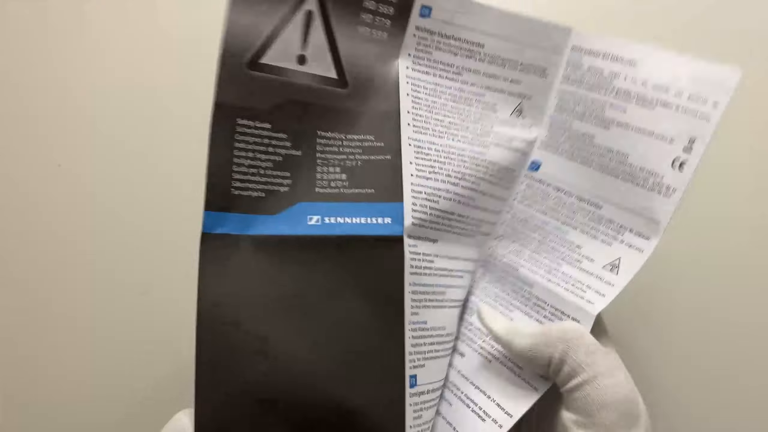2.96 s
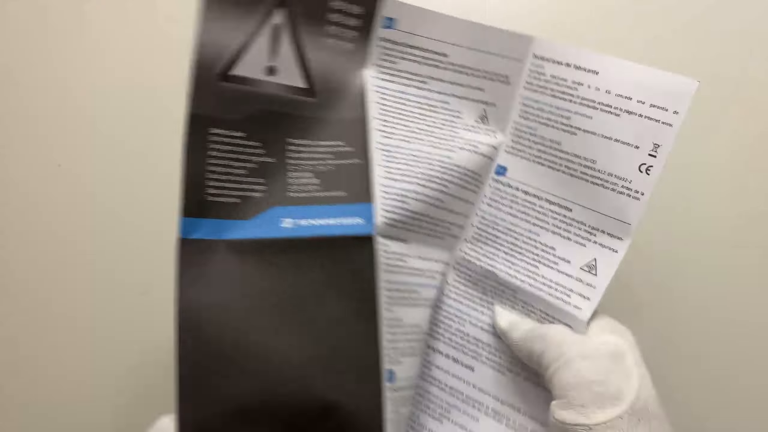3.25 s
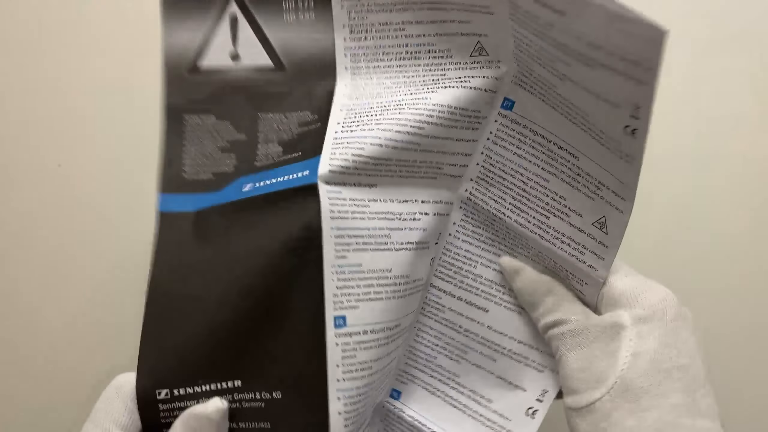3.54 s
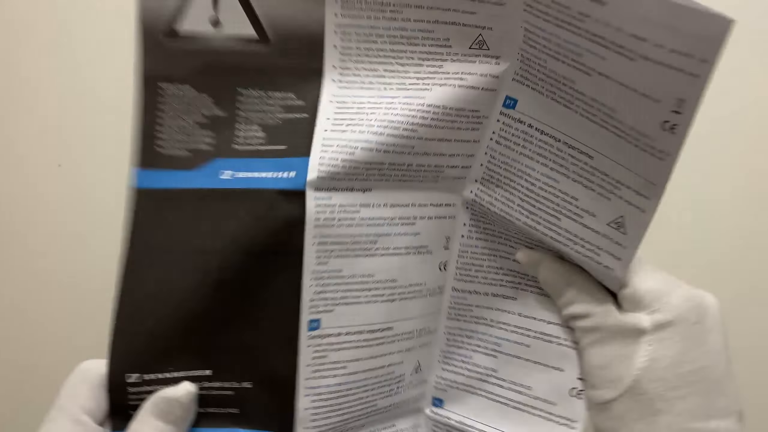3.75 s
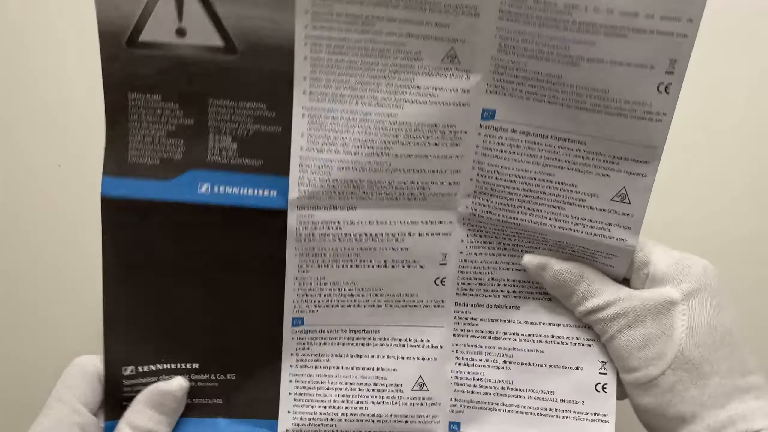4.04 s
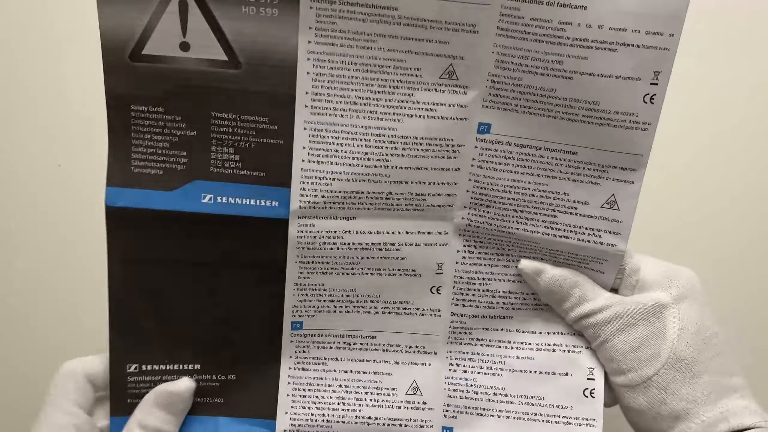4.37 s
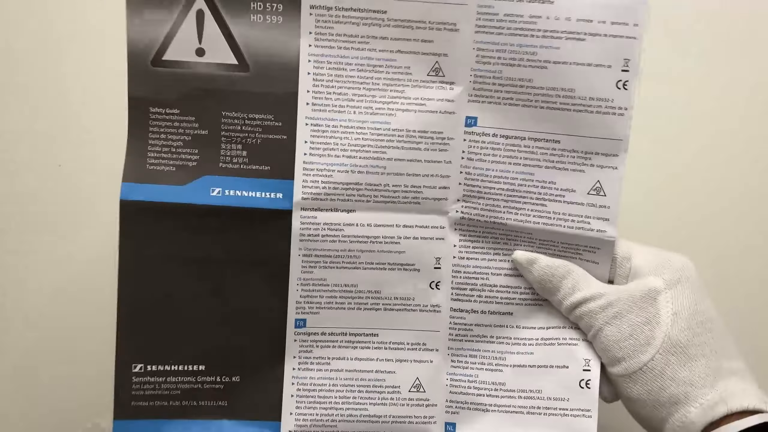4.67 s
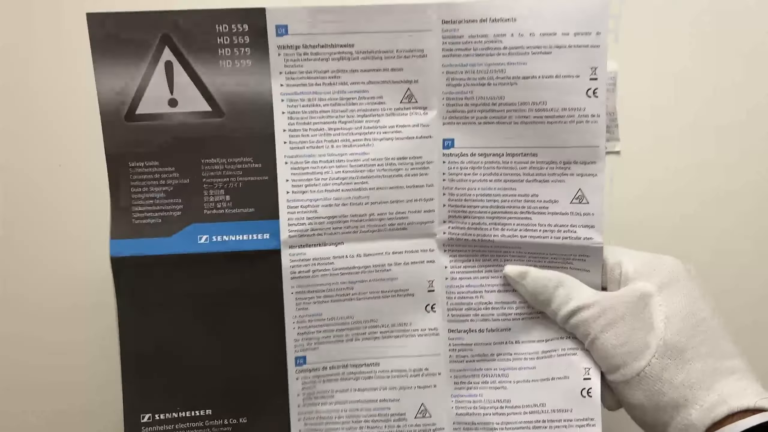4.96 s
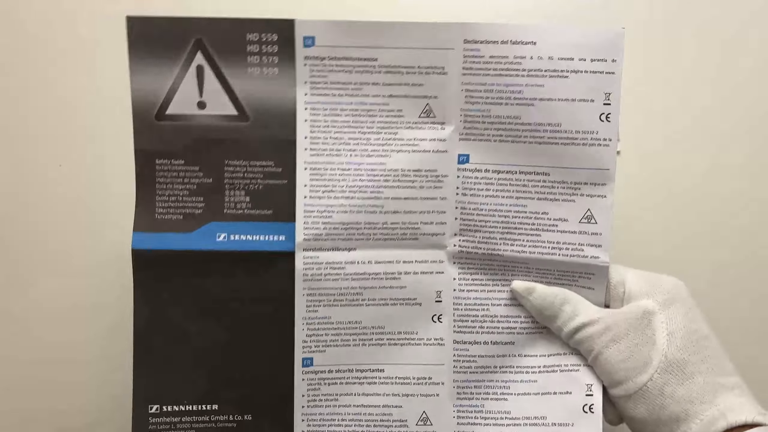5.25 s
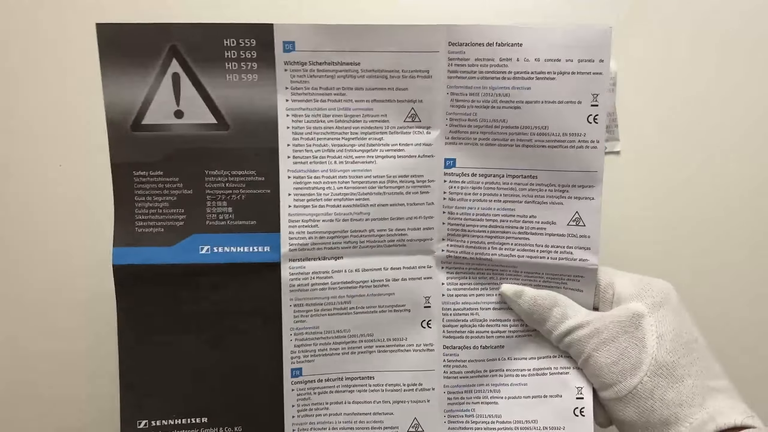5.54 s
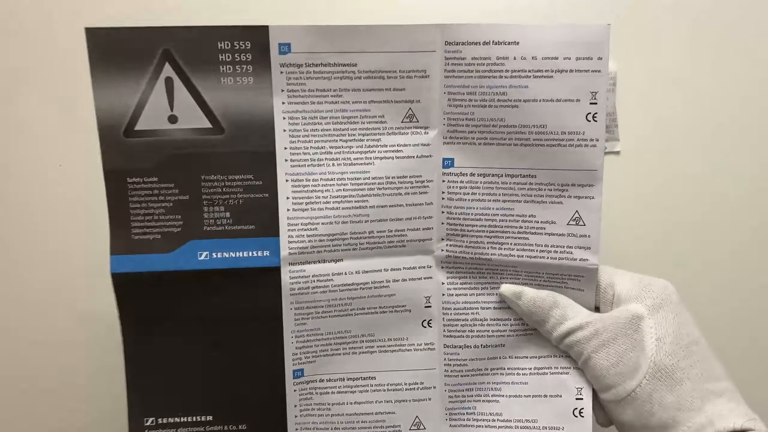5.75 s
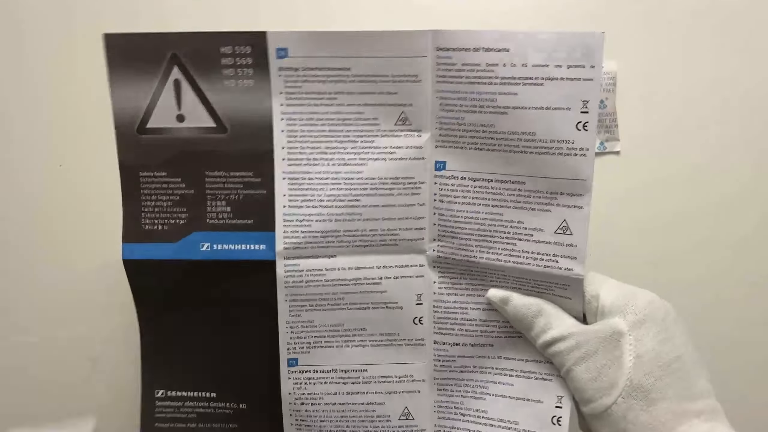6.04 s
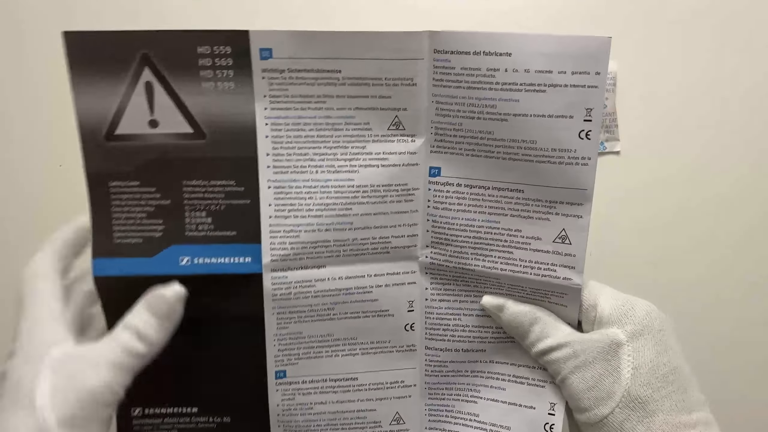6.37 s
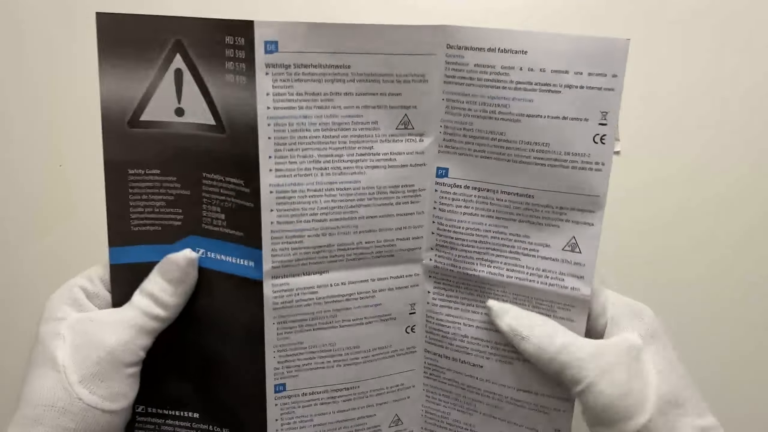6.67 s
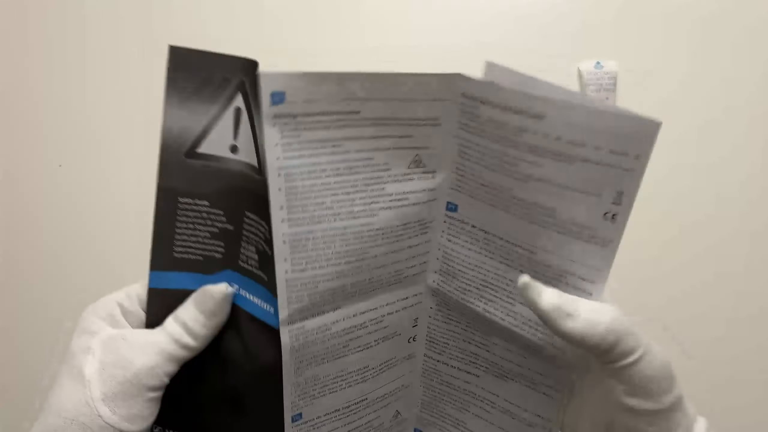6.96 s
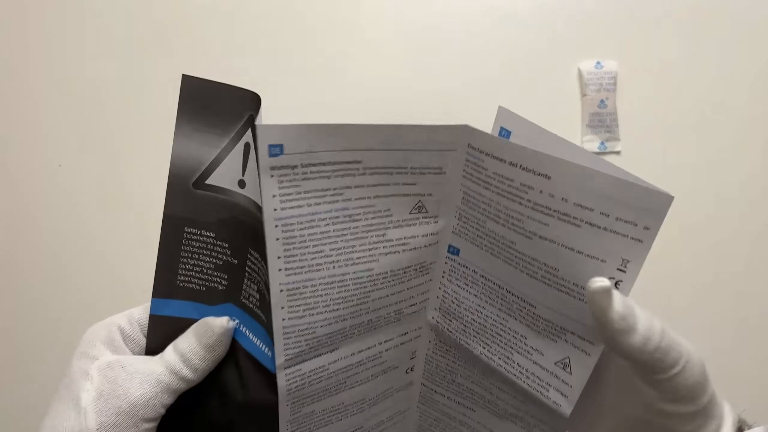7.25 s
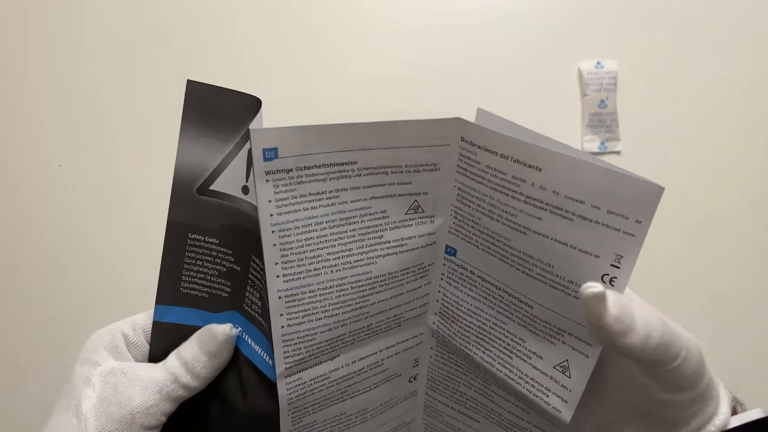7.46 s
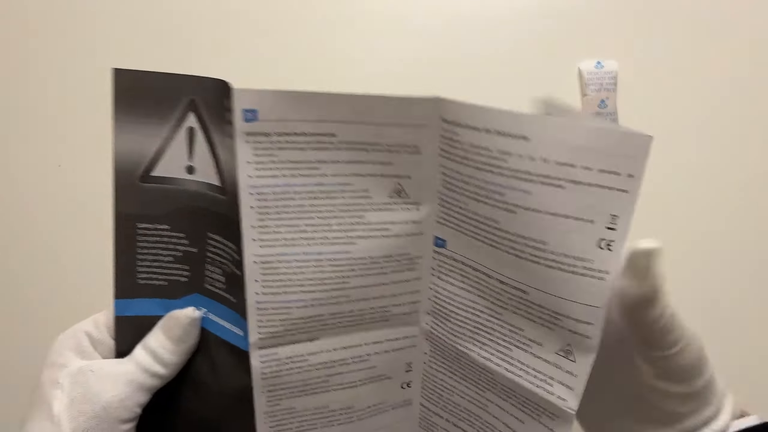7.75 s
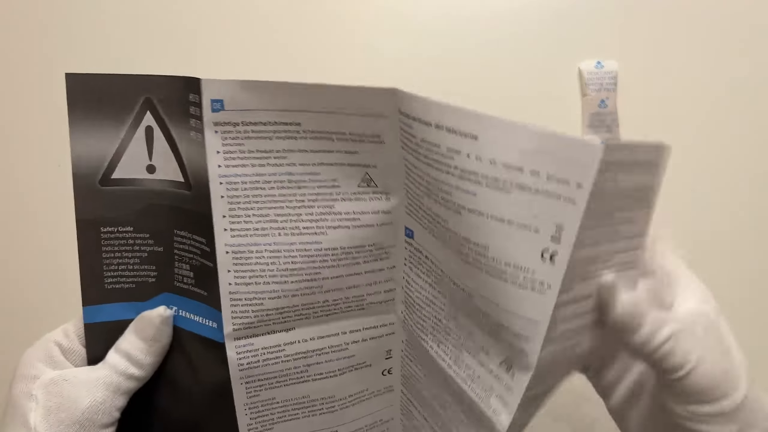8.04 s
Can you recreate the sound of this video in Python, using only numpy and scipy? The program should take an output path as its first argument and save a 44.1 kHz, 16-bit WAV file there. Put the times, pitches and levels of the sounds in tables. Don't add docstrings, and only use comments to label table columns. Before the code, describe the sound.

A stiff folded leaflet is handled by gloved hands very close to a phone microphone in a small quiet room with faint low rumble and barely audible hum. Several crisp snaps with soft low flaps come in the first 0.3 s, then faint rustling, with a snap at 0.9 and a bright double crack with a brief hiss at 1.7. Small ticks and crinkles continue to about 3. Cracks at 3.15 lead into a dense flurry from 3.55 to 4.1, sharp snaps over crackling paper. It thins to light wrinkles, with a short rustle at 4.7-5.05. Sparse creaks follow, small crackles and soft bumps at 6.5-7.1, then a lull and a quick swish at 7.6-7.7. The loudest crunch bursts out at 8.3-8.5, bright and hissing, with another crack cluster at 8.75-8.9. It fades to near quiet, with last snaps around 9.45 and 9.6.

```python
import sys
import numpy as np
from scipy import signal
from scipy.fft import rfft, irfft, next_fast_len
from scipy.io import wavfile
from scipy.ndimage import uniform_filter1d, map_coordinates

SR = 44100
rng = np.random.default_rng(int(sys.argv[2]) if len(sys.argv) > 2 else 0)


def unload_wav(signal):
    wavfile.write(
        sys.argv[1],
        SR,
        np.round(np.clip(np.atleast_2d(signal).T, -1, 1) * 32767).astype(np.int16),
    )


def nominal_scale(level):
    x = np.asarray(level, float) / 20
    return 10 ** x


N = 428211


def unit(x):
    return x / np.sqrt(np.mean(x ** 2) + 1e-20)


def along(points, hz, index=1):
    columns = np.transpose(points)
    return np.interp(np.log(hz + 1), np.log(columns[0] + 1), columns[index])


def filtered(x, response):
    size = next_fast_len(N + 8192)
    return irfft(rfft(x, size) * response(np.fft.rfftfreq(size, 1 / SR)), size)[..., :N]


def wobble(rate):
    knots = rng.standard_normal(int(N * rate / SR) + 4)
    return map_coordinates(knots, [np.arange(N) * rate / SR])


def burst(t, noise, lo_hz, hi_hz, rise, t60):
    puff = noise * (1 - np.exp(-t / rise)) * nominal_scale(-60 * t / t60)
    band = signal.butter(2, [lo_hz, min(hi_hz, 20000)], "band", fs=SR)
    puff = signal.lfilter(*band, puff)
    return puff / np.abs(puff).max()


def plucks(rows, gain_db, cycles, rough, size):
    out, t = np.zeros(N + SR), np.arange(size) / SR
    for (s, db, hz), noise in zip(rows, rng.standard_normal((len(rows), size))):
        ring = np.sin(2 * np.pi * hz * t) * (1 - np.exp(-t * hz)) * np.exp(-t * hz / cycles)
        puff = burst(t, noise, hz / 1.7, hz * 1.37, rise=0.5 / hz, t60=7 * cycles / hz)
        out[round(s * SR):][:size] += nominal_scale(db + gain_db) * (ring / np.abs(ring).max() + rough * puff)
    return out[:N]


def grainy(spectrum, per_second, spread_db, smooth_db):
    when, size = rng.random(N), rng.exponential(size=N)
    grains = (when < per_second / SR) * nominal_scale(spread_db * np.minimum(size, 3)) * rng.standard_normal(N)
    release = rng.standard_normal(128) * nominal_scale(-60 * np.arange(128) / SR / 0.0028)
    rough = unit(signal.fftconvolve(grains, release)[:N])
    rough = unit(filtered(rough + nominal_scale(smooth_db) * rng.standard_normal(N), lambda hz: nominal_scale(along(spectrum, hz))))
    return rough


def patchy(x, depth_db):
    z = signal.stft(x, nperseg=256)[2]
    field = uniform_filter1d(rng.standard_normal(z.shape), size=5, axis=0)
    field = uniform_filter1d(field, size=12, axis=1)
    return unit(signal.istft(z * nominal_scale(depth_db * unit(field)), nperseg=256)[1][:N])


def gestures(s, peak_db, fall, rise):
    t = np.arange(N) / SR
    now = np.searchsorted(s, t) - 1
    last, coming = np.maximum(now, 0), np.minimum(now + 1, len(s) - 1)
    fading = peak_db[last] - fall[last] * np.abs(t - s[last])
    fading[now < 0] = -np.inf
    swelling = peak_db[coming] - rise * np.abs(s[coming] - t)
    return np.maximum(fading, swelling)


def pips(level_db, per_second, hz, cycles):
    when, pitch, size = rng.random((round(per_second * N / SR), 3)).T
    start, t = (when * N).astype(int), np.arange(400)
    pitch = hz * np.exp(1.5 * (pitch[:, None] - 0.5)) / SR
    rings = np.sin(2 * np.pi * pitch * t) * np.exp(-pitch * t / cycles) * (1 - np.exp(-pitch * t))
    rings = rings * nominal_scale(level_db[start] + 18 * size ** 2)[:, None]
    return np.bincount((start[:, None] + t).ravel(), rings.ravel(), N + len(t))[:N]


# (frequency [Hz], level [dB])
RUMBLE_COLOUR = [(29, -36), (38, -14), (54, 4), (75, -20.5), (147, -1.5), (172, -22.5), (204, -10.5),
                 (233, -13), (600, -30), (1320, -120)]
# (frequency [Hz], width [Hz], level [dB])
HUM_LINES = [(48, 14, -72), (94, 17, -72), (144.8, 6.8, -71)]


def background():
    rumble = unit(filtered(rng.standard_normal(N), lambda hz: nominal_scale(along(RUMBLE_COLOUR, hz))))
    out = nominal_scale(-68.0 + 0.42 * wobble(4.0)) * rumble
    for centre, width, db in HUM_LINES:
        resonance = lambda hz: 1 / (1 + (2 * (hz - centre) / width) ** 2)
        out += nominal_scale(db) * unit(filtered(rng.standard_normal(N), resonance))
    return out


# (frequency [Hz], density [dB per Hz])
FLEX_COLOUR = [(90, -11), (150, -4.5), (230, -5), (350, -7), (800, -13.5), (1400, -120)]
# (frequency [Hz], density [dB per Hz])
CRINKLE_COLOUR = [(240, -19), (432, -8.5), (901, -9), (2240, -8.5), (5500, -15), (7150, -25.5),
                  (12100, -120)]
# (time [s], crinkle level [dB], settling [dB per s], low flexing re crinkle [dB])
BEND_GESTURES = [(0.04, -49.5, 32, 0.5), (0.76, -59, 24, -2), (0.95, -51.5, 21, -2.5),
                 (1.715, -46, 25, -15.5), (2.09, -57.5, 14, -2.5), (2.26, -57, 23, 2),
                 (2.67, -56.5, 22, -1), (3.07, -58.5, -4, -4), (3.142, -47.5, 29, -3.5),
                 (3.581, -44.5, 200, 2.5), (3.67, -35.5, 29, -8), (4.03, -38, 72, -9),
                 (4.35, -53, 37, -5.5), (4.716, -58, 7, -4), (4.735, -52.5, 35, -3), (4.9, -47.5, -50, -3),
                 (5.031, -44.5, 64, -4.5), (5.62, -71, -59, 8.5), (5.819, -57, 19, -5),
                 (6.513, -53.5, 12, -4), (6.531, -53.5, 21, 4), (6.86, -64.5, 10, 6), (7.17, -67.5, 73, 1),
                 (7.41, -78.5, -38, -1), (7.56, -54.5, -62, -4), (7.71, -45, 75, -6),
                 (7.95, -64.5, 17, 8.5), (8.17, -56, 85, -0.5), (8.351, -40, -12, 1), (8.48, -32, 75, -9.5),
                 (8.77, -34.5, 154, -7), (8.91, -43, 70, -9), (9.21, -64, 2, 5.5), (9.36, -61, 12, 7.5),
                 (9.436, -53.5, 10, 4), (9.47, -50.5, 23, -4.5)]


def bending(clump):
    s, db, fall, low_db = np.transpose(BEND_GESTURES)
    rise = 230
    flex_db = gestures(s, db + low_db, 0.75 * fall, rise) - 7.5
    crinkle_db = gestures(s, db, fall, rise) - 5.0
    flex = grainy(FLEX_COLOUR, 150, spread_db=3.5, smooth_db=0.0)
    flex = nominal_scale(flex_db + clump + 1.8 * wobble(30)) * flex
    stir = clump + 1.5 * wobble(90)
    grain = patchy(grainy(CRINKLE_COLOUR, 450, spread_db=2.0, smooth_db=8.5), depth_db=1.77)
    deep = filtered(grain, lambda hz: 1 / (1 + (hz / 750) ** 4))
    crinkle = nominal_scale(crinkle_db - 2.5 + stir) * (grain - deep) + nominal_scale(flex_db + 4.0 + stir) * deep
    pops = pips(crinkle_db - 7 + clump, 160, 1500, cycles=1.6)
    fizz = pips(crinkle_db - 8 + clump, 120, 3600, cycles=1.2)
    return flex + crinkle + pops + fizz


# (frequency [Hz], density [dB per Hz])
SLIDE_COLOUR = [(2350, -15), (4000, -8.5), (5100, -9.5), (6940, -7), (8400, -10), (9730, -16.5),
                (12100, -18), (14000, -35), (15700, -37.5), (16500, -43)]
# (time [s], hiss level [dB], slowing [dB per s])
SLIDE_GESTURES = [(0.05, -54.5, 63), (0.38, -59, 31), (0.55, -59.5, 75), (0.82, -63.5, 180),
                  (0.95, -56.5, -2), (1.12, -58, 9), (1.54, -57, 8), (1.659, -62, 4), (1.73, -45.5, 70),
                  (2.1, -68, 37), (2.2, -59.5, 200), (2.33, -56, 71), (2.7, -68, 69), (2.98, -69, 66),
                  (3.121, -64, 5), (3.13, -54, 26), (3.5, -58.5, 14), (3.67, -52.5, 22.5), (4.03, -57, 46),
                  (4.35, -57, 27), (4.718, -72, 9), (4.74, -50.5, 37), (5.03, -59, 15),
                  (5.27, -62.5, 128.5), (5.7, -63, 69), (5.92, -66, 38), (6.38, -71.5, 11.5),
                  (6.49, -65.5, -9), (6.514, -76, 1), (6.53, -59, 36), (6.96, -72.5, 22), (7.15, -70, 73),
                  (7.398, -93.5, 6), (7.405, -75, -20), (7.6, -48.5, 94), (8.08, -65, -36),
                  (8.17, -63.5, 37), (8.38, -51, 20), (8.48, -36, 119), (8.85, -57.5, 63),
                  (9.13, -58.5, 78), (9.26, -62.5, 40), (9.31, -63.5, 89), (9.38, -61.5, 38),
                  (9.45, -60, 2), (9.7, -55.5, 4)]


def sliding(clump):
    slide_db = gestures(*np.transpose(SLIDE_GESTURES), rise=198) - 4
    hiss = patchy(grainy(SLIDE_COLOUR, 1600, spread_db=10.5, smooth_db=8.0), depth_db=1.0)
    return nominal_scale(slide_db + 0.27 * clump + 2.3 * wobble(30)) * hiss


def pages():
    clump = 1.6 * wobble(45)
    return bending(clump) + sliding(clump)


# (time [s], crack peak level [dB], crack pitch [Hz], flap re crack [dB], tick re crack [dB])
MAIN_CREASES = [(0.028, -25, 2240, -1.5, -11.5), (0.087, -30, 1570, -33, -2.5),
                (0.194, -29.5, 1750, -4.5, -9), (0.276, -21.5, 1450, -11.5, -19),
                (0.919, -31, 1850, -7, -7), (1.703, -28, 3170, -25, 5), (1.744, -26, 1530, -29.5, -22.5),
                (9.624, -28.5, 1320, -19, -3.5), (2.642, -29, 1670, -5.5, -14.5),
                (3.129, -31.5, 2050, -2, 7.5), (3.158, -27, 1950, -10, -12),
                (3.564, -20, 2580, -6.5, -14.5), (3.587, -26.5, 1910, -21.5, -3),
                (3.646, -15.5, 2050, -9.5, -15), (3.66, -19, 2500, -30, -18.5), (3.728, -27, 2420, -30, 10),
                (3.851, -22, 1820, -5, -20), (4.015, -21, 2240, -8, -6), (4.883, -26.5, 2040, -9, -0.5),
                (8.331, -15, 2860, -12.5, -5.5), (8.456, -20, 2580, -7, 1), (8.748, -23, 1990, -5, -22),
                (8.768, -20.5, 1650, -22, -6), (9.441, -27, 3120, -9.5, -8.5)]
# (time [s], crack peak level [dB], crack pitch [Hz], tick re crack [dB])
CRISP_WRINKLES = [(0.53, -38.5, 1150, -14), (1.368, -39, 1490, -18), (1.627, -33, 1750, -7),
                  (1.641, -30, 1840, -19), (2.066, -42, 2200, -9), (2.137, -36.5, 2380, -9),
                  (2.255, -38, 1880, -39), (2.8, -36, 1810, -21.5), (3.689, -33, 1563, -9),
                  (3.719, -27, 1750, -27), (3.825, -31.5, 1400, -22), (4.088, -29, 1690, -25),
                  (4.325, -30, 2145, -6.5), (4.721, -38.5, 1160, -24), (4.946, -35, 1150, -9),
                  (5.015, -31.5, 1980, -5), (5.042, -32, 1520, -12.5), (5.812, -31, 1720, -25),
                  (6.517, -30, 2350, -25), (6.631, -31.5, 1670, -9.5), (6.714, -40, 1200, -28.5),
                  (7.691, -26.5, 2660, -24), (8.326, -28, 1900, -29), (8.412, -30, 2340, -3),
                  (8.425, -22.5, 1860, -17), (8.473, -33, 1500, -10), (8.05, -43, 2040, -39),
                  (8.919, -33, 1840, -18), (9.472, -34, 1523, -22), (2.237, -31.5, 1750, -19)]
# (time [s], crack peak level [dB], crack pitch [Hz], flap re crack [dB])
DULL_FOLDS = [(0.74, -41.5, 1450, -5.5), (2.268, -48, 1620, -18), (2.294, -36, 1290, -20),
              (2.366, -36, 1420, -20), (2.42, -39.5, 1190, 3), (2.897, -45, 1360, -0.5),
              (3.153, -29.5, 1505, -22.5), (3.27, -38.5, 1333, 0.5), (3.336, -36.5, 1123, 1),
              (3.363, -47.5, 1114, 8), (3.787, -32.5, 1200, -42), (3.876, -44, 1450, -20),
              (4.059, -43, 1390, -6), (4.136, -43.5, 1443, 4), (4.179, -41, 1100, -4),
              (5.029, -43, 1250, -7), (5.793, -41, 910, -22), (6.567, -29, 1540, -9),
              (6.58, -35, 1810, -12), (6.644, -37.5, 1370, -25), (6.794, -45, 2160, 7),
              (7.588, -35, 2420, -4.5), (7.893, -44, 1510, -2), (7.972, -39, 2150, -0.5),
              (8.889, -30, 1194, -22.5), (8.312, -43, 790, -10), (8.712, -35, 905, -2),
              (8.731, -34, 1793, -32), (9.133, -44, 1380, 8.5), (9.232, -46, 990, -5)]
# (time [s], crack peak level [dB])
FAINT_CREAKS = [(0.617, -51), (0.841, -51), (1.324, -45.5), (1.563, -50), (1.931, -47.5), (3.998, -37.5),
                (4.435, -48.5), (4.585, -50.5), (4.878, -36), (5.226, -46.5), (5.75, -45), (7.021, -47),
                (8.192, -49.5), (5.585, -63)]


def creases():
    wrinkles = [(s, db, hz, -6, tick_db) for s, db, hz, tick_db in CRISP_WRINKLES]
    folds = [(*row, -47.5) for row in DULL_FOLDS]
    creaks = [(*row, 1470, 2.5, -28.5) for row in FAINT_CREAKS]
    return list(MAIN_CREASES) + wrinkles + folds + creaks


# (frequency [Hz], gain [dB])
SNAP_REACH = [(60, -25), (200, 2), (4200, 3), (5100, 0.5), (7000, 5), (9700, -8), (12200, -10.5),
              (14000, -30.5), (15500, -21.5), (17000, -30.5)]


def snaps():
    out, t, rows = np.zeros(N + SR), np.arange(SR // 12) / SR, creases()
    noise = rng.standard_normal((len(rows), 3, len(t)))
    for (s, db, hz, flap_db, tick_db), (a, b, c) in zip(rows, noise):
        taut = flap_db < -22
        soft = np.clip((-tick_db - 15.0) / 20, 0, 1) * (flap_db > -22)
        crack = burst(t, a, hz / 2.42, hz * (1.9 - 0.56 * soft),
                      rise=0.00053 + 0.004 * soft, t60=0.014 + 9 / hz + 0.0064 * soft)
        cycles = 2.0 + 5 * taut
        note = np.sin(2 * np.pi * hz * t) * (1 - np.exp(-t * hz)) * np.exp(-t * hz / cycles)
        crack = 0.65 * crack + 0.54 * note
        tick = burst(t, b, 3800, 15000, rise=0.0004, t60=0.006)
        flap = burst(t, c, 176, 1100, rise=0.0026, t60=0.077)
        snap = crack + nominal_scale(tick_db + 3) * tick + nominal_scale(flap_db - 5.5) * flap
        out[round(s * SR):][:len(t)] += nominal_scale(db + 0.7) * snap
    return filtered(out[:N], lambda hz: nominal_scale(along(SNAP_REACH, hz)))


# (frequency [Hz], t60 [s])
ROOM_DECAY = [(200, 0.32), (1000, 0.32), (4000, 0.42), (12000, 0.62)]


def room(x, hop=64):
    frames = dict(nperseg=256, noverlap=256 - hop)
    hz, _, z = signal.stft(x, SR, **frames)
    keep = nominal_scale(-120 * hop / SR / along(ROOM_DECAY, hz))
    spread = uniform_filter1d(np.abs(z) ** 2, size=5, axis=0)
    power = [signal.lfilter([0, 0, 0, 1 - k], [1, -k], row) for k, row in zip(keep, spread)]
    noise = signal.stft(rng.standard_normal(N), SR, **frames)[2]
    noise = noise / np.sqrt(np.mean(np.abs(noise) ** 2))
    tail = signal.istft(noise * np.sqrt(np.abs(power)), SR, **frames)[1][:N]
    return filtered(tail, lambda hz: 1 / (1 + (220 / (hz + 1)) ** 4))


# (time [s], peak level [dB], pitch [Hz])
SHORT_CLICKS = [(0.029, -47, 2980), (0.087, -28, 1725), (0.195, -30, 6650), (0.665, -56, 1520),
                (0.753, -49, 1500), (1.368, -45, 3920), (1.629, -35.5, 1860), (1.642, -55, 5620),
                (1.718, -39, 8160), (1.744, -42, 6470), (2.137, -42, 2390), (2.238, -35, 3270),
                (2.257, -40.5, 1920), (2.268, -41, 1810), (2.365, -47, 2530), (2.802, -53, 5880),
                (3.124, -39, 3310), (3.125, -41, 6200), (3.13, -41, 1585), (3.149, -35, 6760),
                (3.162, -34.5, 5420), (3.27, -41, 2450), (3.588, -37, 6460), (3.604, -36, 2620),
                (3.729, -31, 8030), (3.647, -28, 6960), (3.66, -24, 2240), (3.721, -41, 5660),
                (3.852, -30, 2520), (3.883, -39, 2550), (3.991, -44, 2050), (4.1, -38, 2276),
                (4.735, -48, 2430), (4.895, -35, 2400), (5.001, -51, 1650), (5.044, -43, 6140),
                (5.745, -50, 6600), (5.814, -51, 5920), (6.631, -38, 5740), (6.796, -51, 4610),
                (6.796, -42, 2400), (6.909, -56, 2430), (7.604, -40, 5370), (7.604, -41.5, 1980),
                (7.704, -38, 2800), (7.894, -48.5, 2410), (8.247, -53, 2500), (8.276, -52, 1770),
                (8.359, -43, 1850), (8.373, -43, 1790), (8.413, -25.5, 5870), (8.458, -25.5, 1836),
                (8.487, -41, 1715), (8.76, -33, 7700), (5.52, -68, 5010), (8.734, -41, 2550),
                (8.89, -37, 5490), (9.476, -45, 5680)]


def clicks():
    return plucks(SHORT_CLICKS, 0.97, cycles=2.96, rough=0.6, size=800)


# (time [s], peak level [dB], pitch [Hz])
MORE_CLICKS = [
    (0.033, -33.5, 1046),
    (1.744, -25.5, 3580),
    (4.181, -46, 1036),
    (4.886, -26.5, 2650),
    (5.957, -54.5, 545),
    (7.925, -56, 446),
    (3.664, -25, 3100),
]


def more_clicks():
    return plucks(MORE_CLICKS, 0.97, cycles=2.96, rough=0.6, size=800)


# (time [s], peak level [dB], pitch [Hz], deep push re bump [dB])
SOFT_BUMPS = [(0.04, -37.5, 345, -16.5), (0.193, -41.5, 352, -16), (0.274, -35.5, 417, -22),
              (0.915, -42, 157, -24), (1.369, -51.5, 345, -21.5), (1.647, -49.5, 410, -10.5),
              (2.064, -48, 417, -6), (2.266, -41, 350, -22), (2.359, -51, 345, -5), (2.413, -41, 355, -22),
              (3.159, -47, 422, -6.5), (3.359, -39.5, 333, -20), (3.558, -27.5, 360, -29.5),
              (3.759, -38, 437, -21), (4.094, -51, 450, -8), (5.03, -47.5, 440, -11),
              (6.573, -37, 483, -19), (6.905, -51, 305, -1.5), (6.974, -44, 290, -16),
              (7.019, -40, 286, -19.5), (7.067, -49.5, 148, -14), (7.69, -46, 422, -15),
              (8.384, -35.5, 456, -15.5), (8.714, -35.5, 278, -19.5)]


def bumps():
    out, t = np.zeros(N + SR), np.arange(SR // 6) / SR
    noise = rng.standard_normal((len(SOFT_BUMPS), 2, len(t)))
    for (s, db, hz, deep_db), (a, b) in zip(SOFT_BUMPS, noise):
        body = burst(t, a, hz / 1.27, hz * 1.35, rise=0.012, t60=0.058)
        push = burst(t, b, 50, 125, rise=0.0034, t60=0.2)
        out[round(s * SR):][:len(t)] += nominal_scale(db) * (body + nominal_scale(deep_db + 10.5) * push)
    return filtered(out[:N], lambda hz: 1 / (1 + (45 / (hz + 1)) ** 4))


# (time [s], peak level [dB], pitch [Hz])
LOW_POPS = [(0.194, -45, 546), (0.194, -35.5, 1130), (0.277, -26, 1020), (0.841, -49.5, 1060),
            (1.272, -50, 930), (1.368, -47, 870), (1.648, -40, 1014), (8.89, -29.5, 1194),
            (1.933, -47, 1460), (2.359, -47, 433), (2.366, -35, 1160), (2.414, -46.5, 513),
            (2.643, -40, 496), (2.77, -47, 550), (2.897, -42.5, 1450), (3.156, -37.5, 490),
            (3.16, -35.5, 1390), (3.269, -42, 510), (3.297, -47.5, 580), (0.098, -47, 1600),
            (3.336, -35.5, 1120), (3.646, -30, 796), (3.667, -33.5, 666), (3.72, -38, 495),
            (3.826, -31, 1080), (3.877, -34, 1150), (3.985, -44.5, 410), (3.999, -38, 653),
            (4.02, -27.5, 1420), (4.06, -33, 1380), (4.064, -37.5, 555), (4.108, -39, 630),
            (4.141, -41.5, 1490), (4.324, -44, 624), (4.437, -45.5, 600), (5.019, -36.5, 694),
            (5.027, -38, 447), (5.03, -35, 1400), (5.04, -42, 534), (5.712, -54.5, 900),
            (6.525, -44.5, 1150), (6.532, -41.5, 800), (6.54, -42.5, 585), (6.569, -34.5, 1450),
            (6.579, -34.5, 1510), (7.586, -47, 433), (8.193, -45, 1360), (8.312, -38.5, 520),
            (8.336, -25.5, 1230), (8.366, -37.5, 1270), (8.412, -31, 1340), (8.458, -33, 776),
            (8.474, -36.5, 570), (8.475, -27, 1370), (8.502, -38, 610), (8.755, -28, 1320),
            (8.766, -33.5, 970), (9.513, -43.5, 1080)]


def low_pops():
    return plucks(LOW_POPS, -1.1, cycles=2.34, rough=0.59, size=1500)


# (time [s], peak level [dB], pitch [Hz])
LOW_THUMPS = [(0.105, -48, 158), (0.14, -43, 118), (0.925, -52.5, 345), (1.61, -52, 108),
              (2.645, -58.5, 345), (3.33, -51.5, 113), (8.36, -38, 480), (4.965, -44.5, 483),
              (6.73, -53, 125), (6.905, -49, 330), (7.21, -59.5, 330), (8.69, -50, 145),
              (8.93, -51, 340), (9.352, -51.5, 404)]


def thumps():
    return plucks(LOW_THUMPS, -1.5, cycles=4.0, rough=0.48, size=8000)


# (frequency [Hz], width [Hz], gain [dB])
PAGE_HOLLOWS = [(345, 13.3, 5), (436, 21, 1.5), (533, 3.6, 2.5), (1100, 18, -8), (1840, 7.9, -12),
                (2240, 27, -9)]


def hollows(hz):
    response = 1.0
    for centre, width, db in PAGE_HOLLOWS:
        damping = 1j * hz * width
        response = response + nominal_scale(db) * damping / (centre * centre - hz * hz + damping)
    return response


def scene():
    air = background()
    handling = pages() + bumps()
    sharp = snaps() + clicks() + more_clicks() + low_pops() + thumps()
    paper = handling + sharp + nominal_scale(-7.0) * room(sharp)
    front = filtered(paper, hollows) + air
    return np.array([front, front])


def roll_off(x):
    return signal.sosfilt(signal.butter(12, 17110, fs=SR, output="sos"), x)


# (frequency [Hz], side re mid [dB], side phase [rad], share tied to mid [0-1])
PORT_PAIR = [(50, -26, 3.1, .1), (350, -10, 3.1, .9), (850, -6, 2.8, .55), (1800, -17, 3.1, .3),
             (3000, -6, 3.1, .2), (3900, -9, 4.9, .3), (4900, 1, 4.9, .5), (5600, -6, 4.8, .2),
             (6500, -21, 4.7, .3), (7200, -14, 4.7, .9), (9500, 0, 4.7, .9), (12000, 7, 4.7, .9),
             (14000, 23, 4.7, .9), (16500, 12, 4.7, .9)]


def record(dry):
    mid = dry.mean(axis=0)
    turns = np.cumsum(rng.normal(0, 2.2, 900))

    def side_response(hz):
        scatter = np.exp(1j * np.interp(hz, np.linspace(0, SR / 2, len(turns)), turns))
        tied = np.clip(along(PORT_PAIR, hz, index=3), 0, 1)
        lead = np.exp(1j * along(PORT_PAIR, hz, index=2))
        return nominal_scale(along(PORT_PAIR, hz)) * (tied * lead + np.sqrt(1 - tied ** 2) * scatter)

    side = filtered(mid, side_response)
    mid = filtered(mid, lambda hz: 1 - 0.35 / (1 + ((hz - 5100) / 170) ** 2))
    return roll_off(np.array([mid + side, mid - side]))


dry = scene()
out = record(dry)
unload_wav(out)
```